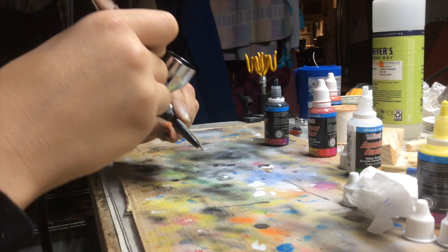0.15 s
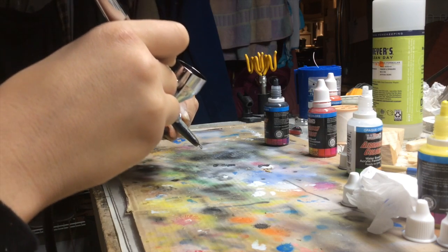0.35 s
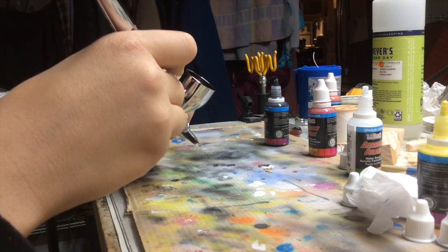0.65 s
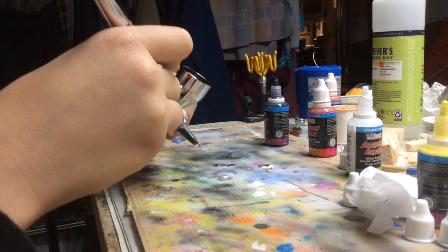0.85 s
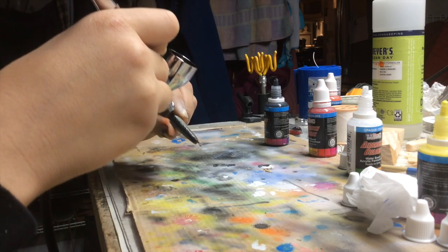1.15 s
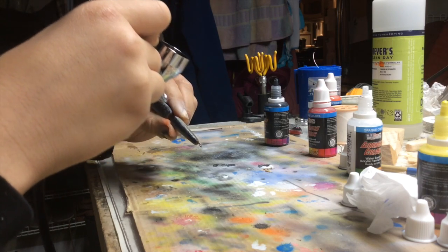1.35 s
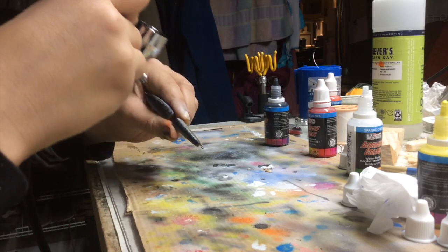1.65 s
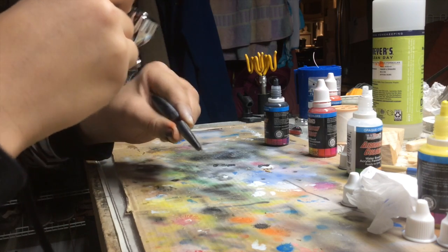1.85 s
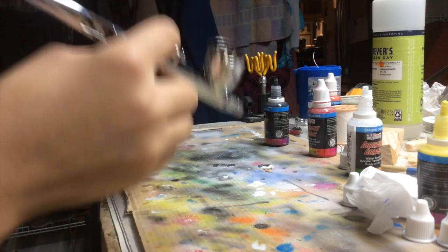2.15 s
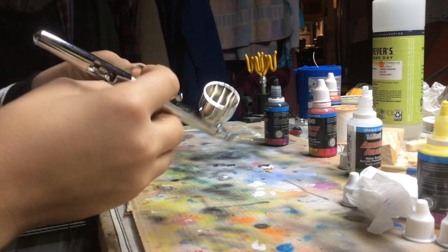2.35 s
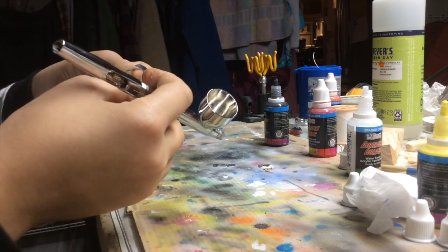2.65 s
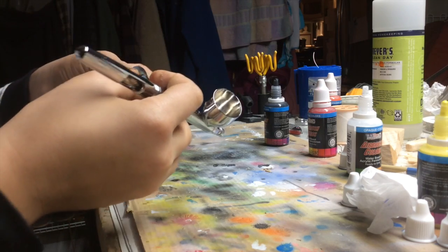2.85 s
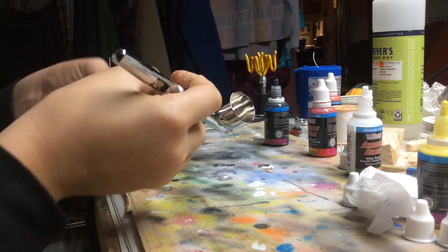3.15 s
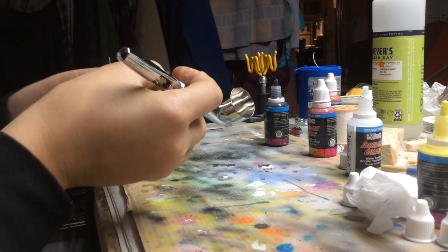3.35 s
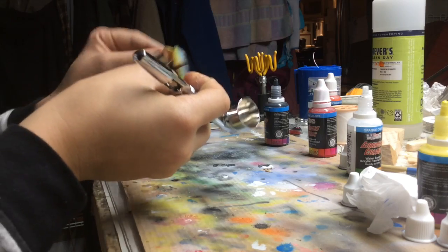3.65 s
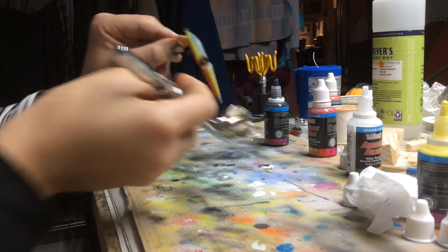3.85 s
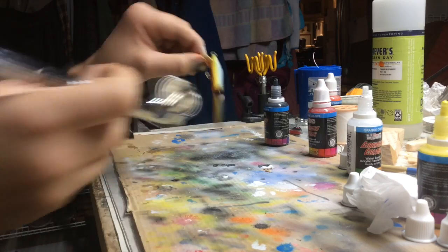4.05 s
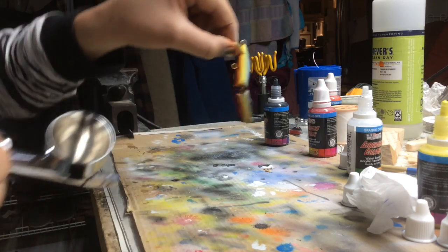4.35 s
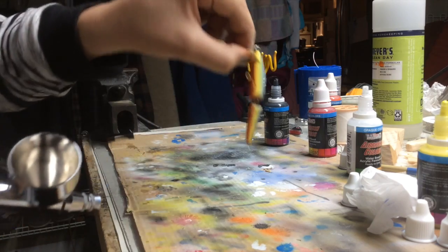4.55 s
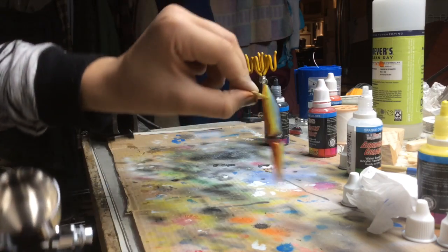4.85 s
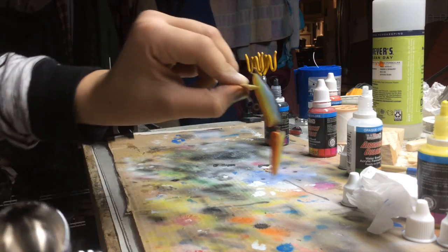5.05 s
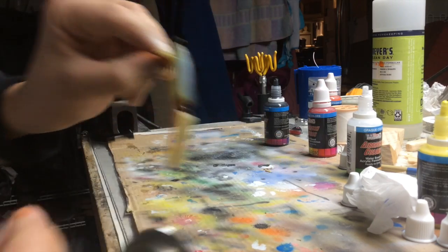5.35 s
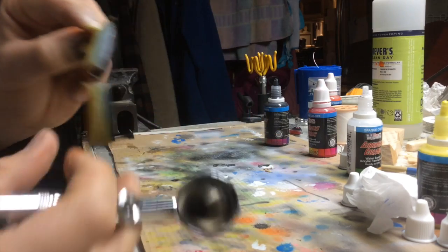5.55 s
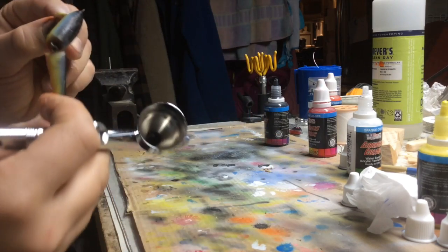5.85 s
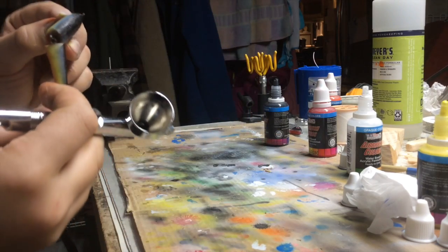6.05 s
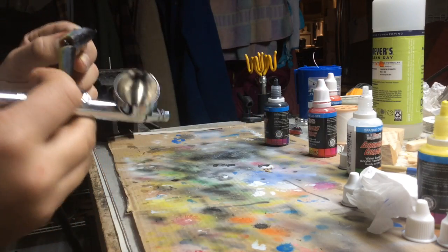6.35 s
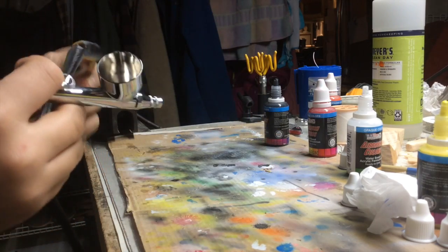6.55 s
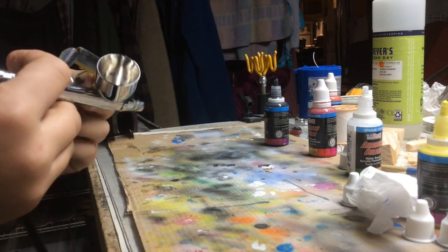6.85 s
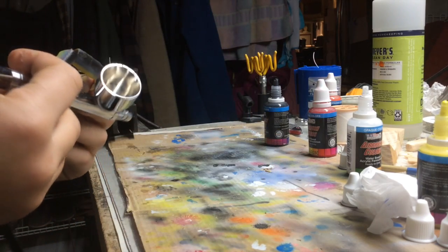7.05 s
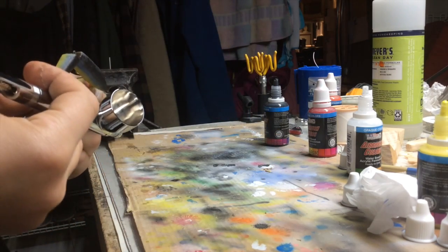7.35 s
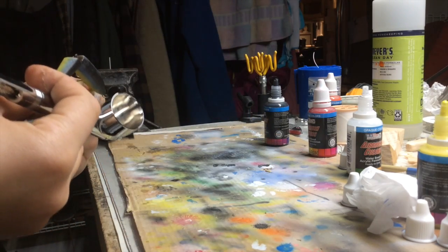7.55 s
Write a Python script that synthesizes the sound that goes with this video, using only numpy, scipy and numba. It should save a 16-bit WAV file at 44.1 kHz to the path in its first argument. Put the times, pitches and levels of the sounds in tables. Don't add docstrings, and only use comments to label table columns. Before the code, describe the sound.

Close, dry indoor sound of airbrushing beside a running compressor. The motor chatters about twenty-seven times a second, with metallic valve ticks, dull rumble, mains hum and soft airy puffs. Bright spray bursts swell and fade, some sizzling and thin, the last fuller and lower, ending just before two seconds. Two small clicks come soon after; the machine then drones steadily on, with a very faint cloth rustle at the close.

```python
import sys
import numpy as np
from scipy import signal
from scipy.fft import rfft, irfft
from scipy.io import wavfile
from scipy.ndimage import uniform_filter1d
from numba import njit

SR = 44100
rng = np.random.default_rng(int(sys.argv[2]) if len(sys.argv) > 2 else 0)


def ratio(d):
    e = np.asarray(d, float) / 20
    return 10 ** e


def persist_wave(psi):
    counts = np.round(np.clip(psi, -1, 1) * 32767).astype(np.int16)
    wavfile.write(sys.argv[1], SR, np.atleast_2d(counts).T)


N = 340452
TURN_HZ = 27.118
SHADED_DB = -5.5


def set_rms(x, db):
    return x * ratio(db) / np.sqrt(np.mean(x ** 2))


def coloured(points):
    hz, db = np.transpose(points)
    log_hz = np.log(np.arange(1, N // 2 + 2) * SR / N)
    gain = ratio(np.interp(log_hz, np.log(hz), db, left=-99, right=-99))
    white = rfft(rng.standard_normal(N))
    return set_rms(irfft(white * gain, N), 0)


def walk(rate):
    hold = int(SR / rate)
    stairs = np.repeat(rng.standard_normal(N // hold + 1), hold)
    return 1.2 * uniform_filter1d(stairs, hold)[:N]


def ring(x, hz, t60, swell_ms=0.018):
    spin = np.exp(2j * np.pi * hz / SR)
    fade = np.exp(-np.log(1000) / (t60 * SR))
    rise = np.exp(-1000 / (max(swell_ms, .01) * SR))
    return signal.lfilter([1 - rise], np.poly([spin * fade, spin * rise]), x).imag


@njit
def svf(x, hz, width):
    y, band, low = np.empty(len(x)), 0., 0.
    for i in range(len(x)):
        g, k = np.tan(np.pi * hz[i] / SR), width / hz[i]
        v = (band + g * (x[i] - low)) / (1 + g * (g + k))
        band, low, y[i] = 2 * v - band, low + 2 * g * v, k * v
    return y


def band_noise(hz, width):
    return svf(rng.standard_normal(N), hz, width)


def curves(table):
    s, *columns = np.transpose(table)
    return [np.interp(np.arange(N) / SR, s, c) for c in columns]


def tones(turns, hum):
    # (level [dB rms], crest after the valve snap [ms])
    shake = [(-56, 21.2), (-41, 4.6), (-46, 4.5), (-47, .8), (-60, 4.1), (-65, 1.4)]
    # (turns added to the hum [count], level [dB rms], sign [+-1])
    hum_lines = [(-2, -62, -1), (-1, -49, -1), (0, -56, 1), (1, -67, -1), (2, -65, 1), (4, -66, 1)]
    # (frequency [Hz], level [dB rms])
    fan = [(46.75, -63), (88.8, -63), (100.16, -59), (115.93, -60)]
    t = np.arange(N) / SR
    out = 0
    for k, (db, ms) in enumerate(shake, start=1):
        phase = k * (turns - ms * TURN_HZ / 1000)
        out = out + ratio(db + 0.5 * walk(7.5)) * np.cos(2 * np.pi * phase)
    for k, db, sign in hum_lines:
        out = out + sign * ratio(db + 0.47 * walk(3.23)) * np.cos(2 * np.pi * (hum + k * turns))
    for hz, db in fan:
        out = out + ratio(db + walk(2.6)) * np.cos(2 * np.pi * (hz * t + rng.random()))
    return out * np.sqrt(2)


def casing(turns, hum, scatter_db=.33, scatter_ms=.022, hum_pull=.16, rattle_db=-51):
    body_modes = [(220, .114, -43.5, 9.61, .04), (289, .058, -37.7, 11.23, 4), (333, .071, -47.9, 17.58, .02),
                  (233, .071, -46.3, 2.35, .45), (603, .049, -39.8, 11.33, 4), (459, .065, -58.5, 11.35, 4),
                  (653, .038, -54.1, 1.9, 4), (869, .104, -52.5, .29, .56), (929, .057, -38.8, .34, 4),
                  (1006, .012, -48.9, 11.51, .02), (773, .2, -68.7, 2.75, 3.85),
                  (1130, 0.043, -59, 1.57, 1.6), (1381.4, 0.037, -42, 0.33, 1.33), (1416, 0.013, -53.5, 23, 0.79),
            (1257, 0.076, -54.5, 12., 1.8), (1639, 0.05, -54.5, 0.41, 0.99), (1600, 0.018, -66, 11, 1.8),
            (2010, 0.024, -47.5, 0.16, 1.05), (2060, 0.039, -56.5, 14., 0.9),
            (2197, 0.056, -57, 0.54, 0.97)]
    valve = [(7650, .015, -52, .1, .6), (10350, .015, -46.5, .1, .4), (9500, .012, -54, .2, .3),
             (11700, .01, -59, .2, .2)]
    snaps = np.interp(np.arange(int(turns[-1])), turns, np.arange(N))
    out = 0
    for hz, t60, db, ms, swell_ms in body_modes + valve:
        time_luck, size_luck = rng.standard_normal((len(snaps), 2)).T
        at = np.minimum(snaps + (ms + scatter_ms * time_luck) * SR / 1000, N - 2)
        whole = at.astype(int)
        spread_db = scatter_db * (1 + min(hz, 2000) / 1500)
        pull = 1 + hum_pull * np.cos(2 * np.pi * (hum[whole] + 0.27))
        size = pull * ratio(spread_db * size_luck)
        drive = ratio(rattle_db) * rng.standard_normal(N)
        drive[whole] += size * (whole + 1 - at)
        drive[whole + 1] += size * (at - whole)
        out = out + ratio(db) * ring(drive, hz, t60, swell_ms)
    return out


def air(turns):
    # (frequency [Hz], level [dB per Hz])
    leak_colour = [(1410, -17), (2400, -5.5), (2620, -12), (3070, -12.5), (3430, -10), (3750, -15),
                   (4070, -11), (4610, -15.5), (5040, -8), (5590, -11.5), (7110, -8), (7460, -9),
                   (8270, -5), (10200, 2), (12400, -5.5), (16100, -39), (22000, -120)]
    # (frequency [Hz], level [dB per Hz])
    leak_top = [(12200, -16), (12500, -14), (13300, -16), (14000, -1), (14900, -9), (15600, -5),
                (15900, -2)]
    # (frequency [Hz], width [Hz], level [dB rms])
    whistles = [(1550, 24, -65.5), (3719, 35, -74), (3850, 30, -78.5), (5080, 200, -74.5)]
    ms = turns % 1 * 1000 / TURN_HZ
    leak = coloured(leak_colour) + ratio(-16.5) * coloured(leak_top)
    bright = signal.sosfilt(signal.butter(2, 6000., "high", fs=SR, output="sos"), leak)
    stroke = 0.46 + 0.38 * np.exp(-((ms - 18) / 5.6) ** 2)
    puff = 1.18 * np.exp(-ms / 2.8) * bright
    out = set_rms((stroke * leak + puff) * ratio(0.77 * walk(20)), -57)
    for hz, width, db in whistles:
        whistle = ring(rng.standard_normal(N), hz, 2.6 / width)
        out = out + set_rms(whistle * ratio(1.5 * walk(3.09)), db)
    return out


def rumble():
    # (frequency [Hz], level [dB per Hz])
    rumble_colour = [(15, -22), (30, -11), (60, -2), (95, -5), (140, -4), (230, -21), (330, -18),
                     (450, -24), (750, -26), (1200, -25.5), (2000, -27), (2600, -41)]
    return set_rms(coloured(rumble_colour), -52)


def passes(turned):
    # (start [s], length [s], splash [dB], slant [dB]); glancing air splashes brighter
    strokes = [
        (0.062, .1, -44, -0.5),
        (.27, .17, -47, 3),
        (.43, .26, -48.5, 6),
        (0.863, .3, -47.5, 5),
        (1.312, 0.14, -43.5, 3.5),
        (1.595, 0.19, -42.5, -4),
    ]
    attack_s, release_s = 0.066, 0.092
    miss_slant_db = 4.5
    first_reach_s = 0.084
    t = np.arange(N) / SR
    miss_db = -51 + SHADED_DB * np.clip(1 - t / first_reach_s, 0, 1) ** .3
    square = ratio(2 * miss_db)
    glancing = ratio(2 * (miss_db + miss_slant_db + SHADED_DB * turned))
    for start, length, db, slant_db in strokes:
        corners = np.cumsum([start, attack_s, max(length - attack_s, 0), release_s])
        shape = np.interp(t, corners, [0, 1, 1, 0]) ** 2
        square = square + ratio(2 * db) * shape
        glancing = glancing + ratio(2 * (db + slant_db)) * shape
    return np.sqrt(square), np.sqrt(glancing)


def airbrush():
    # (time [s], air flow [dB], nozzle facing the microphone [dB])
    trigger = [
        (0, -39.5, -12),
        (.18, -33, -8),
        (.29, -39.5, -6),
        (.6, -36.5, -12),
        (.8, -40, -9),
        (.93, -38, -12),
        (1.22, -37, -8),
        (1.38, -31.5, -8),
        (1.55, -37.5, -13),
    ]
    # (frequency [Hz], level [dB per Hz])
    jet_colour = [(3530, -36), (6000, -16), (6330, -33), (6620, -10), (7290, -12), (7860, -3.5), (8680, -5),
                  (9490, 3), (10200, 0.5), (11200, 2), (13200, -7.5)]
    # (frequency [Hz], level [dB per Hz])
    jet_top = [(7760, -32), (13200, -8), (14200, 3), (15800, -4)]
    # (centre [Hz], centre once turned [Hz])
    dip_hz = [(3330., 3080.), (5750., 5430.), (6180., 6150.), (13150., 13050.), (4570., 3900.),
              (15100., 14500.)]
    # (width [Hz], depth [0-1], depth once turned [0-1])
    dip_shapes = [(450., .72, .9), (600., .15, .95), (450., .95, .85), (700., .97, .9), (400., .5, .3),
                  (700., .3, .9)]
    turn_s, turn_length_s = 1.475, 0.13
    splash_hz, turned_splash_hz, glance_hz, wander = 2154, 2340, 4470, 0.029
    echo_ms, echo_gain = 2.1, 0.23
    valve_shut_s, shut_tail_s = 1.862, 0.014
    t = np.arange(N) / SR
    hiss_db, top_db = curves(trigger)
    turned = np.clip((t - turn_s) / turn_length_s, 0, 1)
    square, glancing = passes(turned)

    low_hz = (splash_hz + (turned_splash_hz - splash_hz) * turned) * (1 + wander * walk(5.2))
    high_hz = glance_hz * (1 + wander / 2 * walk(5.15))
    roar = coloured([(700, -22), (1000, -0.5), (1300, 1.5), (1650, 4), (1900, -33)])

    flutter = .9 * walk(110)
    flow = ratio(hiss_db + flutter + .5 * walk(14))
    jet = flow * (coloured(jet_colour) + ratio(top_db + walk(30.3)) * coloured(jet_top))

    low = set_rms(svf(band_noise(low_hz, 1100.0), low_hz, 1100.0), 0)
    high = set_rms(svf(band_noise(high_hz, 2000.0), high_hz, 2000.0), 0)
    sizzle = set_rms(band_noise(np.full(N, 7550), 2500.), -5.5)
    high = high + ratio(SHADED_DB * turned) * sizzle
    splash = square * ratio(flutter + walk(90)) * low
    splash = splash + glancing * ratio(flutter + .7 * walk(90)) * high
    splash = splash + square * ratio(-6 + walk(90)) * roar
    splash = splash * ratio(0.77 * walk(15.35))

    echo = echo_gain * np.roll(splash, int(echo_ms * SR / 1000))
    spray = jet + 0.86 * (splash + echo)
    for (hz, turned_hz), (width, depth, turned_depth) in zip(dip_hz, dip_shapes):
        centre = (hz + (turned_hz - hz) * turned) * (1 + .006 * walk(7.8))
        depth_now = depth + (turned_depth - depth) * turned
        spray = spray - depth_now * svf(spray, centre, width)
    return spray * np.exp(-np.maximum(t - valve_shut_s, 0) / shut_tail_s)


def knock():
    # (time [s], frequency [Hz], t60 [s], level [dB])
    taps = [
        (2.154, 680, .055, -42),
        (2.154, 725, .04, -51),
        (2.85, 550, .04, -47),
    ]
    out = 0
    for s, hz, t60, db in taps:
        click = ratio(db) * (np.arange(N) == int(s * SR))
        out = out + ring(click, hz, t60)
    return out


def rustle():
    # (start [s], stop [s], frequency [Hz], width [Hz], level [dB rms])
    brush = (7.45, 7.9, 2900., 900., -68)
    start, stop, hz, width, db = brush
    swell = np.interp(np.arange(N) / SR, [start, (start + stop) / 2, stop], [0, 1, .5])
    cloth = band_noise(np.full(N, hz), width) * ratio(3 * walk(60))
    return swell * set_rms(cloth, db)


def scene():
    # (time [s], lead [ms])
    drift = [
        (0, -1.3),
        (1.8, -.4),
        (3.5, -.1),
        (5.6, .2),
        (6.6, -.7),
        (7.72, -.6),
    ]
    t = np.arange(N) / SR - .0123
    turns = TURN_HZ * (t + curves(drift)[0] / 1000)
    hum = 119.82 * t + .03
    compressor = tones(turns, hum) + casing(turns, hum) + air(turns) + rumble()
    mono = compressor + airbrush() + knock() + rustle()
    return np.tile(mono, (2, 1))


def roll_off(x):
    return signal.sosfilt(signal.butter(12, 15760, fs=SR, output="sos"), x)


def record(dry):
    return roll_off(dry)


dry = scene()
out = record(dry)
persist_wave(out)
```